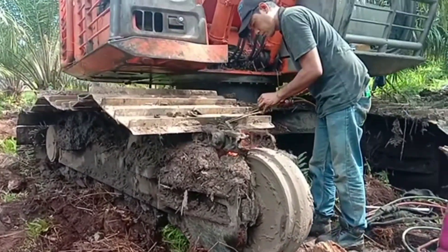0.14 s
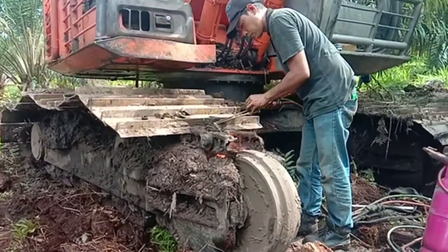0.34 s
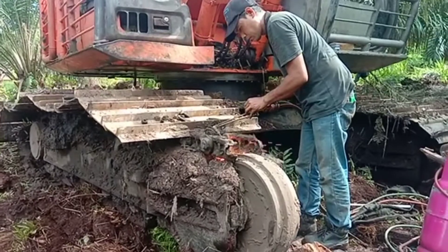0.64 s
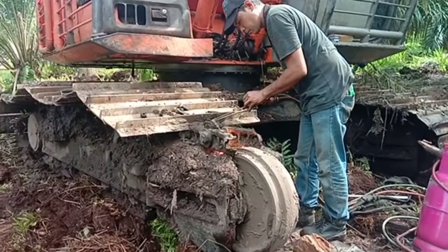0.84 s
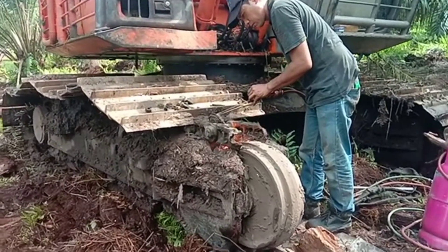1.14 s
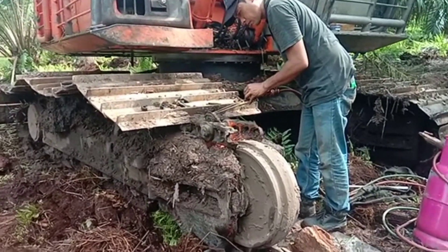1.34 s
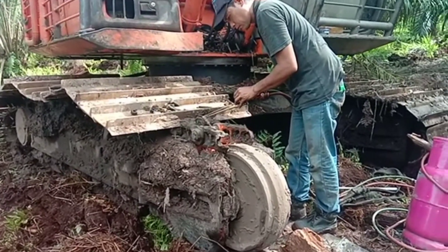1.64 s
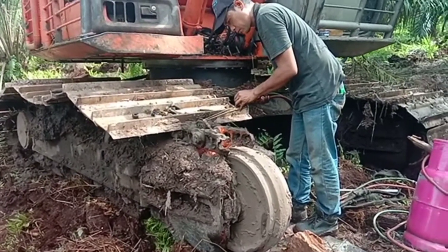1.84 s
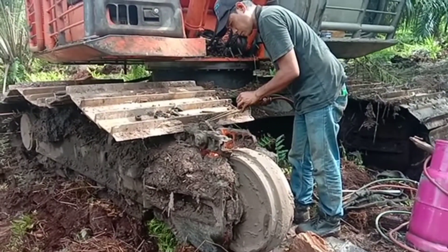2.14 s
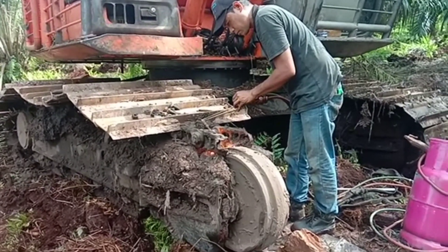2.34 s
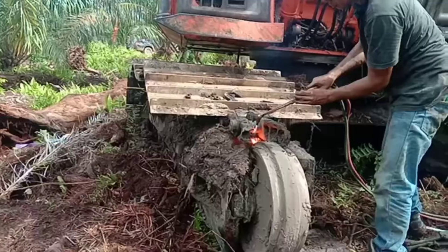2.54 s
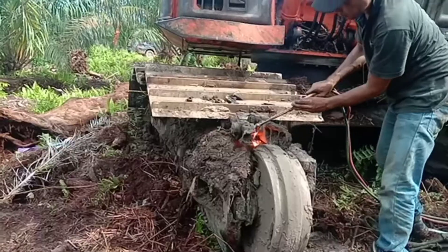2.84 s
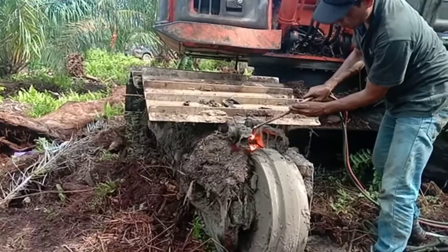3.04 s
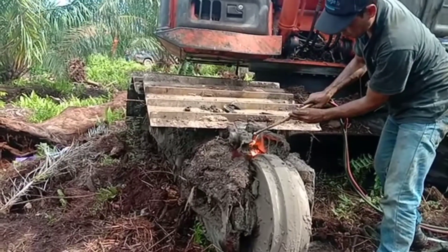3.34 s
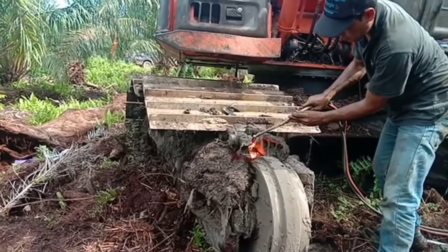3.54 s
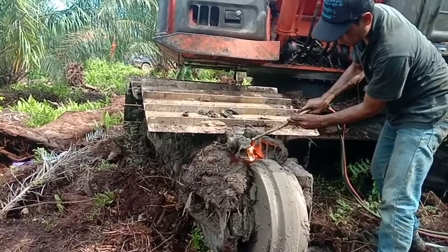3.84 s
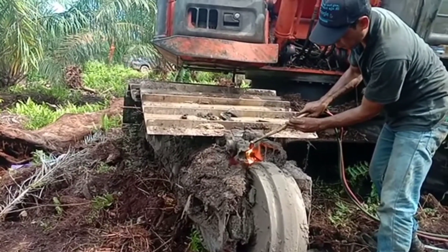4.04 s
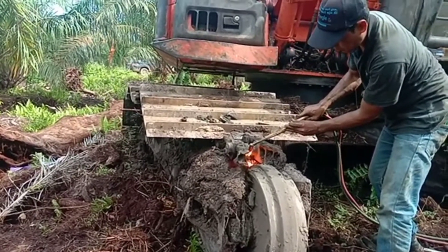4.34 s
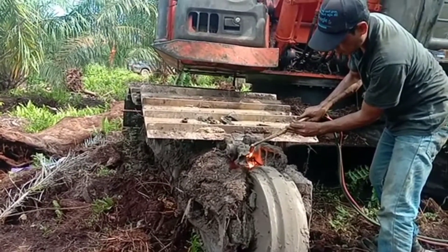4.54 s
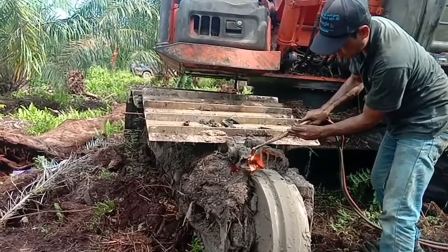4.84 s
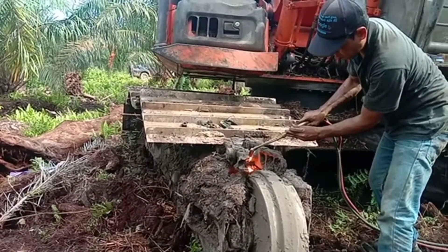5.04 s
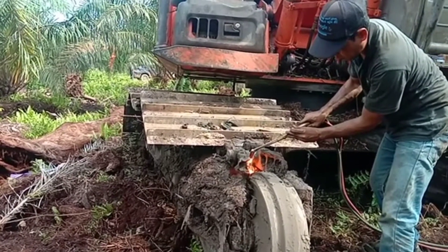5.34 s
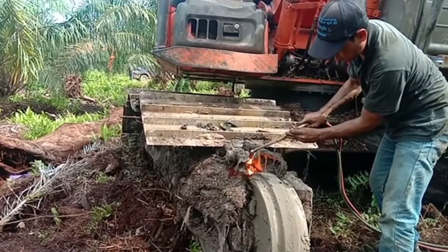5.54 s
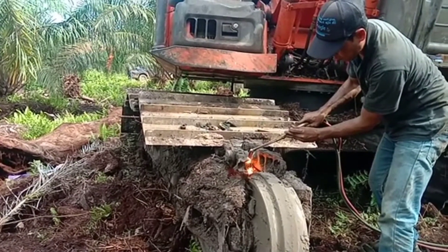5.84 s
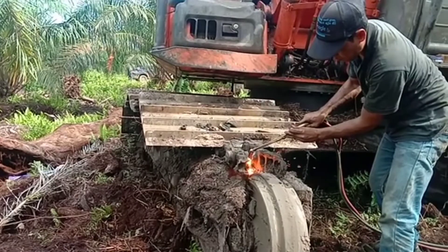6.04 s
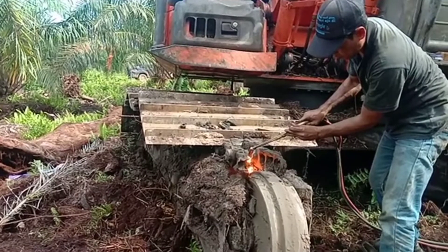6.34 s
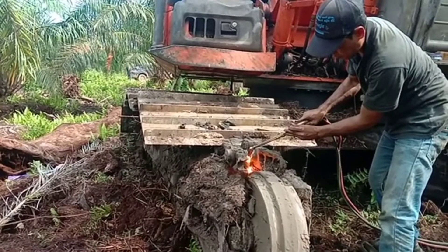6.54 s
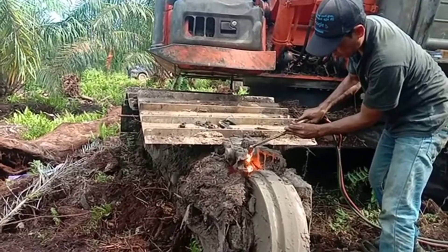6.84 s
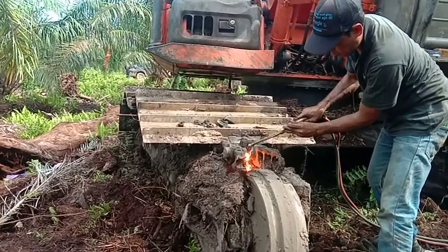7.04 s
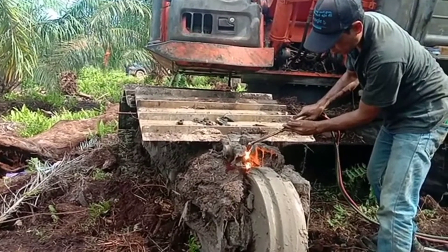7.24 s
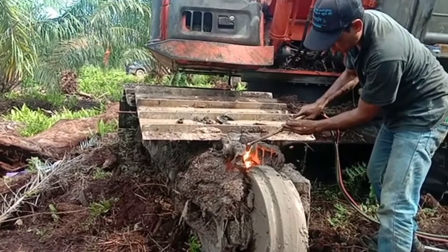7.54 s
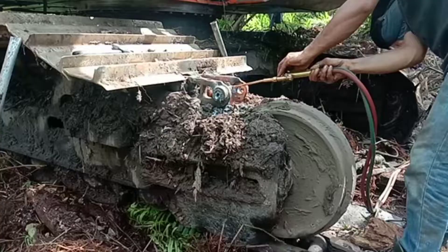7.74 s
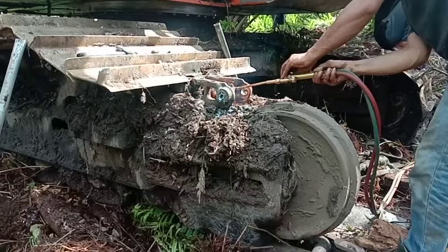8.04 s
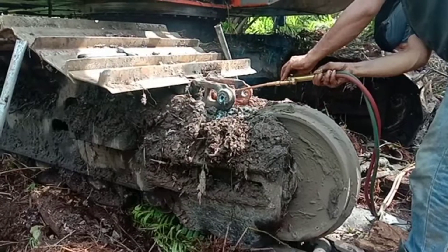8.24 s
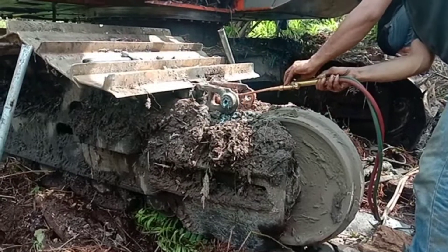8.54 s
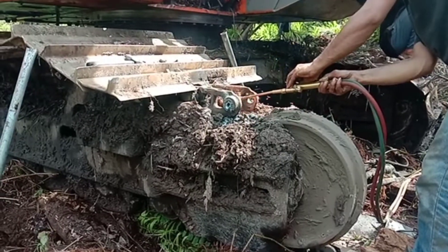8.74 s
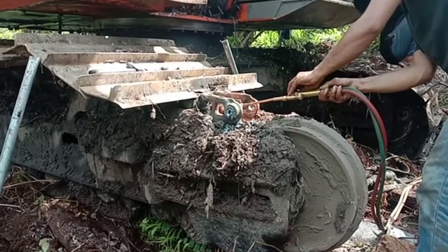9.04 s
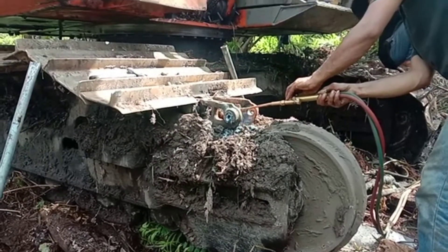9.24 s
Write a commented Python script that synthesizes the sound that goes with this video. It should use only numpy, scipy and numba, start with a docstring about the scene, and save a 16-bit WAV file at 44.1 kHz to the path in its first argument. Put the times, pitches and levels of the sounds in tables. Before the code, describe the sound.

A cutting torch hisses and roars on steel outdoors, gurgling, rumbling, fading to silence, then a sharp pop and two close hard blasts of gas.

```python
"""An oxy-fuel torch cuts a steel track chain on an excavator outdoors, heard from three places in turn.
From the side, the oxygen jet hisses brightly (filtered noise) and the flame gurgles in the molten pool.
From the front, the jet pierces with a rumble; the sound fades out, its upper hiss fluttering more when quiet.
After a silence the flame pops, and close by come two hard blows, the first ringing the cut, then a whisper.
Throughout, noise roars in the cut, a hollow rings, slag spits, and nearby track plates comb the sound."""
import sys
import numpy as np
from scipy import signal
from scipy.fft import rfft, irfft, next_fast_len
from scipy.io import wavfile
from scipy.ndimage import uniform_filter1d, map_coordinates
from numba import njit

SR = 44100
rng = np.random.default_rng(int(sys.argv[2]) if len(sys.argv) > 2 else 0)


def persist_wave(psi):
    """Save psi, clipped to +-1, as 16-bit WAV."""
    counts = np.round(np.clip(psi, -1, 1) * 32767).astype(np.int16)
    wavfile.write(sys.argv[1], SR, np.atleast_2d(counts).T)


N = 414099
TIME = np.arange(N) / SR

# level of the torch's sound, at each place: (t/s, flame roar level/dB, jet hiss level/dB)
SIDE_BLOW = [(0.0, -36, -36.5), (0.12, -32.5, -34), (0.53, -30, -30.5), (1.02, -32, -36),
             (1.32, -30.5, -29.5), (1.54, -34, -32), (1.7, -32, -34), (2.2, -31, -29), (2.3, -33, -33)]
FRONT_BLOW = [(2.42, -32, -43), (2.99, -35, -42.5), (3.09, -37.5, -45), (3.25, -33.5, -42.5),
              (3.69, -39, -40.5), (3.75, -36, -34.5), (3.98, -38, -42.5), (4.17, -34.5, -34),
              (4.82, -34.5, -34.5), (5.45, -37, -39.5), (5.57, -37, -46), (5.76, -38.5, -41),
              (6.22, -45.5, -50), (6.57, -51, -47), (6.99, -56, -53.5), (7.04, -52.5, -54),
              (7.14, -57, -59), (7.26, -54.5, -56.5)]
CLOSE_BLOW = [(8.0, -33.5, -34.5), (8.112, -35.5, -34), (8.242, -42.5, -39), (8.674, -45, -38),
              (8.822, -32.5, -37), (9.04, -36, -39), (9.102, -49.5, -56), (9.204, -49.5, -51.5),
              (9.36, -48.5, -61.5)]
# tone colour of the oxygen jet, from each place: (f/Hz, relative level per Hz/dB)
SIDE_JET_COLOUR = [(2800, -37.5), (4200, -21.5), (4870, -7.5), (5500, -3.5), (6830, 0.5), (7450, 0),
                   (8000, -8.5), (8780, -6), (9900, -13.5), (11500, -3), (12700, -2.5), (14000, -12),
                   (14750, 1.5), (15600, -7.5)]
FRONT_JET_COLOUR = [(2590, -32), (4400, -12), (5070, -19), (5290, -23), (5460, -4), (6230, -5.5),
                    (6810, 0.5), (7340, 0), (8190, -4.5), (9500, -3.5), (11000, -14), (13400, -12),
                    (14600, -3), (15200, 1), (15500, -19)]
CLOSE_JET_COLOUR = [(2400, -54), (4100, -33), (4580, -2.5), (5600, -1.5), (7350, -4), (8270, -9),
                    (9240, -3), (10500, -10.5), (12500, -2), (13700, -18), (15000, 8), (15600, -1)]
# tone colour of the flame in the cut, from each place: (f/Hz, relative level per Hz/dB)
SIDE_ROAR_COLOUR = [(800, -39), (1080, -25), (1270, -0.5), (1470, -6), (1790, -7), (2070, -0.5), (2340, -1),
                    (2650, -3), (3600, -9), (3800, -11.5), (4190, -29.5), (5700, -58)]
FRONT_ROAR_COLOUR = [(800, -55), (1000, -18.5), (1270, -7.5), (1550, -7.5), (1800, -1.5), (2430, 0.5),
                     (2740, 1), (3080, -1.5), (3320, -3.5), (3820, -4.5), (4200, -11.5), (4430, -37),
                     (5300, -42)]
CLOSE_ROAR_COLOUR = [(750, -35), (1000, -14), (1250, -2), (1420, -16.5), (1600, 1), (1740, -9), (1890, -2),
                     (2050, -4.5), (2200, 0), (2780, -9.5), (3020, -23.5), (3600, -17), (4900, -27)]
# turbulent body of the flame: (f/Hz, relative level per Hz/dB)
RUMBLE_COLOUR = [(24, -69.5), (40, -31.5), (279, -4.5), (333, -8.5), (371, -11), (426, 0), (530, -6.5),
                 (591, 0.5), (651, -3), (821, 1), (941, -11), (1050, -9), (1360, -40), (2310, -120)]
# melt blown into a spray: (f/Hz, relative level per Hz/dB)
SPRAY_COLOUR = [(2000, -31.0), (3200, 11), (5000, -2), (9000, -5.0), (15000, -3)]
# how far the jet has pierced the steel, heard from the front: (t/s, share 0-1)
PIERCE = [(2.4, .9), (2.6, 1), (3.0, 0.2), (3.9, 1), (4.15, 0.26), (5.0, 0)]
# pops of the flame: (t/s, crack level/dB, thump level/dB, length of the push/ms)
POPS = [(7.7099, -36, -42, .16), (7.7326, -44, -51, .25), (7.9382, -17, -14.5, .24)]
# the jet whistles on a sharp edge or across the hollow: (middle t/s, length/s, f/Hz, level/dB)
WHISTLES = [(2.73, 0.11, 14600, -45), (9.106, 0.087, 5520, -52), (9.215, 0.092, 5730, -65),
            (9.254, 0.092, 2460, -52), (9.298, 0.079, 5250, -58), (9.335, 0.15, 1248, -44.5)]
# sound paths via the farther track plates: (delay/ms, level/dB)
FAR_PLATES = [(3.3, -21), (6.101, -17)]

# roar and hiss at full blow; the other layers are set against this level
FULL_DB = -34.5
# a jet that blows through rumbles, sizzles and swirls more: dB added when fully pierced
PIERCE_RUMBLE_DB, PIERCE_SIZZLE_DB, PIERCE_EDDY_DB = 7.5, 3.5, 1.8
# the upper hiss flutters more when quiet: dB below full level where it does so most, and dB of flutter added
QUIET_BELOW_DB, QUIET_FLUTTER_DB = 13.5, 2.5
# note of the hollow between the chain links
HOLLOW_HZ = 1275.4
# slag spits, relative to the gas noise before colouring
JET_SPIT_DB, FLAME_SPIT_DB = -16, -14.5
# side to front is a hard cut; front to close fades out and in again
CUT_S, SILENT_FROM_S, SILENT_TO_S = 2.37, 7.542, 7.636
FADE_OUT_S, FADE_OUT_POWER, FADE_IN_S, FADE_IN_POWER = 0.26, 0.91, 0.33, 2.09
TOP_HZ = 15550


def jet(outline, hiss_db, sizzle_db, edge_hz, edge_db, eddy_db, flutter_db):
    """Oxygen hisses out of the nozzle, sings broadly on the steel's edge and sizzles in the melt."""
    gas = turbulence(eddy_hz=416, eddy_rate=11, eddy_db=eddy_db, surge_rate=24, surge_db=1.0)
    spits = slag(rate=190, spread_db=3.5, ring_s=0.0007)
    gas = colour(gas + undb(JET_SPIT_DB) * spits, outline)
    hiss = low_part(gas, 8, 10200)
    sizzle = unit(gas - hiss)
    edge = undb(edge_db) * unit(ring_noise_twice(edge_hz, 1000))
    sizzle_gain = undb(sizzle_db + flutter_db * walk(22))
    return undb(hiss_db) * unit(unit(hiss) + edge) + sizzle_gain * sizzle


def flame(outline, roar_db, hollow_db, body_db):
    """The flame roars in the cut and rings a hollow between the chain links; body_db weights its lower part."""
    gas = turbulence(eddy_hz=250.0, eddy_rate=16, eddy_db=1.5, surge_rate=18, surge_db=0.62)
    spits = slag(rate=64, spread_db=2.5, ring_s=0.0014)
    gas = unit(colour(gas + undb(FLAME_SPIT_DB) * spits, outline))
    body = low_part(gas, 6, 1650)
    # a wavering note, narrowed again around the hollow's own pitch
    ring = resonate(rng.standard_normal(N), HOLLOW_HZ * (1 + 0.0094 * walk(4.4)), 110.0)
    ring = resonate(ring, np.full(N, float(HOLLOW_HZ)), 210.0)
    hollow = undb(hollow_db) * unit(ring)
    return undb(roar_db) * unit(gas - body + undb(body_db) * body + hollow)


def rumble(deep_db):
    """The burning gas flutters low down; its deepest part comes in puffs."""
    gas = turbulence(eddy_hz=152, eddy_rate=12, eddy_db=3.0, surge_rate=18, surge_db=1.4)
    gas = colour(gas, RUMBLE_COLOUR)
    deep = low_part(gas, 3, 230)
    puffs = undb(3.8 * walk(16) + deep_db)
    return unit(gas - deep + deep * puffs)


def gurgle(centre_hz, width_hz, wander):
    """The flame gurgles in the molten pool; its note wavers and breaks up."""
    hz = centre_hz * (1 + wander * walk(15))
    return unit(ring_noise_twice(hz, width_hz)) * undb(5.1 * walk(13.88))


def spray(hiss_db):
    """A strong jet blows the melt into a spray whose broad hiss grows faster than the jet's own."""
    level_db = follow(hiss_db, full_db=-41.5, growth=1.5)
    return undb(level_db) * unit(colour(rng.standard_normal(N), SPRAY_COLOUR))


def kerf(hiss_db, centre_hz, width_hz):
    """Only a hard-blown jet rings the narrow slot of the cut; the ring's level falls steeply with the hiss."""
    hz = centre_hz * (1 + 0.011 * walk(6))
    level_db = follow(hiss_db, full_db=-49, growth=4.6)
    return undb(level_db) * unit(ring_noise_twice(hz, width_hz))


def slag(rate, spread_db, ring_s):
    """Molten droplets burst in the jet: many tiny spits (rate per second), a few larger."""
    sizes_db = spread_db * np.minimum(rng.exponential(size=N), 4)
    spits = (rng.random(N) < rate / SR) * undb(sizes_db)
    dying = signal.lfilter([1], [1, -np.exp(-1 / (ring_s * SR))], spits)
    return unit(dying * rng.standard_normal(N))


def pops(thump_hz, thump_s, ring_hz, ring_db):
    """A pocket of gas ignites: a sharp push that rings the hollow, then a damped swing back."""
    cracks, thumps = np.zeros(N), np.zeros(N)
    for s, crack_db, thump_db, push_ms in POPS:
        cracks += undb(crack_db) * np.exp(-(1000 * (TIME - s) / push_ms) ** 2)
        since_s = np.clip(TIME - s - 0.0005, 0, 1)  # the swing starts half a millisecond later
        swing = np.sin(2 * np.pi * thump_hz * since_s) * np.exp(-since_s / thump_s)
        thumps -= undb(thump_db) * swing
    ring = resonate(cracks, np.full(N, float(ring_hz)), 130.0)
    return cracks + thumps + undb(ring_db) * ring


def whistles(width_hz):
    """Narrow, wavering edge tones that swell and die."""
    out = np.zeros(N)
    for s, length_s, hz, db in WHISTLES:
        tone = resonate(rng.standard_normal(N), hz * (1 + 0.0045 * walk(24)), float(width_hz))
        swell = np.exp(-(2 * (TIME - s) / length_s) ** 2)
        out += undb(db) * unit(tone) * swell
    return out


def plates(x, near_ms, near_db, sway_ms):
    """Short reflections from the nearest plate and the farther ones comb the sound; it sways with the hand."""
    out, power = x, 1
    for delay_ms, db in [(near_ms, near_db), *FAR_PLATES]:
        lag = (delay_ms + sway_ms * walk(4)) * SR / 1000  # in samples
        out = out + undb(db) * map_coordinates(x, [np.arange(N) - lag], order=2)
        power = power + undb(2 * db)
    return out / np.sqrt(power)


def turbulence(eddy_hz, eddy_rate, eddy_db, surge_rate, surge_db):
    """Gas noise: eddies swell in patches eddy_hz wide and glide in pitch while the whole stream surges."""
    f, t, z = signal.stft(rng.standard_normal(N), SR, nperseg=512)
    depth_db = np.interp(t, TIME, eddy_db * np.ones(N))
    glide = np.interp(t, TIME, 2 * walk(4))  # in patches
    row, column = np.meshgrid(f / eddy_hz, t * eddy_rate, indexing="ij")
    patches = rng.standard_normal((160, 512))
    eddies = map_coordinates(patches, [row + glide, column], order=2, mode="wrap")
    gain = undb(depth_db * eddies)
    gain = gain / np.sqrt(np.mean(gain ** 2, axis=0))  # eddies move energy about without adding any
    gas = signal.istft(z * gain, SR)[1][:N]
    return unit(gas) * undb(surge_db * walk(surge_rate))


@njit
def resonate(x, hz, width):
    """State-variable band-pass, width in Hz, whose centre moves every sample."""
    y, band, low = np.empty(len(x)), 0., 0.
    for i in range(len(x)):
        g, k = np.tan(np.pi * hz[i] / SR), width / hz[i]
        v = (band + g * (x[i] - low)) / (1 + g * (g + k))
        band, low, y[i] = 2 * v - band, low + 2 * g * v, k * v
    return y


def ring_noise_twice(hz, width_hz):
    """Noise through the same moving resonance twice, for steeper sides."""
    once = resonate(rng.standard_normal(N), hz, float(width_hz))
    return resonate(once, hz, float(width_hz))


def low_part(x, order, top_hz):
    """The part of a sound below top_hz, without delay, so that x minus it is the upper part."""
    return signal.sosfiltfilt(signal.butter(order, top_hz, fs=SR, output="sos"), x)


def colour(x, points):
    """Filter by a (f/Hz, level/dB) outline."""
    hz, db = np.transpose(points)
    size = next_fast_len(N + 4096)
    f = np.maximum(np.fft.rfftfreq(size, 1 / SR), 1)
    gain = undb(np.interp(np.log(f), np.log(hz), db))
    return irfft(rfft(x, size) * gain, size)[:N]


def walk(rate):
    """Random levels, each held 1 / rate seconds and smoothed twice; rms 1."""
    k = int(SR / rate)
    held = np.repeat(rng.standard_normal(N // k + 2), k)[rng.integers(k):][:N]
    return unit(uniform_filter1d(uniform_filter1d(held, k), k))


def curves(table):
    """Each column of a table, joined by straight lines in time."""
    s, *columns = np.transpose(table)
    return [np.interp(TIME, s, c) for c in columns]


def follow(drive_db, full_db, growth):
    """Level of a layer that has full_db at full blow and gains growth dB for each dB of its drive."""
    return full_db + growth * (drive_db - FULL_DB)


def tilt(at_s, length_s, from_hz, to_hz):
    """The hand tilts the nozzle, and the note of the jet on the edge slides to a new pitch around at_s."""
    return from_hz + (to_hz - from_hz) * np.clip((TIME - at_s) / length_s + 0.5, 0, 1)


def fade(elapsed_s, length_s, power):
    """Gain that grows from 0 to 1 over length_s."""
    return np.clip(elapsed_s / length_s, 0, 1) ** power


def undb(db):
    """Decibels to gain."""
    return 10 ** (np.asarray(db) / 20)


def unit(x):
    """Scale to rms 1."""
    return x / np.sqrt(np.mean(x ** 2))


def from_side():
    """Bright hiss; the flame gurgles in the molten pool."""
    roar_db, hiss_db = curves(SIDE_BLOW)
    sizzle_db = follow(hiss_db, full_db=-37, growth=0.5)
    edge_hz = tilt(at_s=1.14, length_s=0.24, from_hz=5070, to_hz=8620)
    oxygen = jet(SIDE_JET_COLOUR, hiss_db, sizzle_db, edge_hz, edge_db=-8.0, eddy_db=1.1, flutter_db=0.0)
    roar = flame(SIDE_ROAR_COLOUR, roar_db, hollow_db=-11, body_db=-1.5)
    low = undb(follow(hiss_db, full_db=-55.5, growth=1.13)) * rumble(deep_db=0)
    pool_gain = undb(follow(hiss_db, full_db=-54, growth=0.25))
    pool = pool_gain * gurgle(centre_hz=919, width_hz=127, wander=0.037)
    return plates(oxygen + roar + low + pool, near_ms=1.45, near_db=-30.5, sway_ms=0.017)


def from_front():
    """The jet pierces the steel with a rumble; later the sound fades and its upper hiss flutters more."""
    roar_db, hiss_db = curves(FRONT_BLOW)
    pierce, = curves(PIERCE)
    quietness = np.clip((FULL_DB - hiss_db) / QUIET_BELOW_DB, 0, 1)
    sizzle_db = follow(hiss_db, full_db=-41.5, growth=0.84) + PIERCE_SIZZLE_DB * pierce
    edge_hz = tilt(at_s=3.25, length_s=0.27, from_hz=9700, to_hz=7220)
    oxygen = jet(FRONT_JET_COLOUR, hiss_db, sizzle_db, edge_hz, edge_db=-6.5,
                 eddy_db=2.2 + PIERCE_EDDY_DB * pierce, flutter_db=0.1 + QUIET_FLUTTER_DB * quietness)
    hollow_db = follow(roar_db, full_db=-10, growth=0.4)
    body_db = follow(roar_db, full_db=0.0, growth=0.33)
    roar = flame(FRONT_ROAR_COLOUR, roar_db, hollow_db, body_db)
    rumble_db = follow(roar_db, full_db=-51.0, growth=1.09) + PIERCE_RUMBLE_DB * pierce
    low = undb(rumble_db) * rumble(deep_db=-4.0)
    return plates(oxygen + roar + low + spray(hiss_db), near_ms=1.67, near_db=-12.5, sway_ms=0.045)


def from_close():
    """Two hard blows, the first ringing the cut; then the oxygen drops to a whisper."""
    roar_db, hiss_db = curves(CLOSE_BLOW)
    sizzle_db = follow(hiss_db, full_db=-37, growth=1.24)
    edge_hz = tilt(at_s=8.1, length_s=0.9, from_hz=5100, to_hz=5600)
    oxygen = jet(CLOSE_JET_COLOUR, hiss_db, sizzle_db, edge_hz, edge_db=-9, eddy_db=0.0, flutter_db=1.7)
    roar = flame(CLOSE_ROAR_COLOUR, roar_db, hollow_db=-7, body_db=2)
    low = undb(follow(roar_db, full_db=-49.5, growth=0.65)) * rumble(deep_db=-2.5)
    slot = kerf(hiss_db, centre_hz=3480, width_hz=780)
    return plates(oxygen + roar + low + slot, near_ms=1.564, near_db=-15.5, sway_ms=0.028)


def scene():
    """From the side, then the front, and after a moment of silence close to the idler wheel."""
    first = np.where(TIME < CUT_S, from_side(), from_front())
    first = first * fade(SILENT_FROM_S - TIME, FADE_OUT_S, FADE_OUT_POWER)
    second = from_close() * fade(TIME - SILENT_TO_S, FADE_IN_S, FADE_IN_POWER)
    bangs = pops(thump_hz=109.1, thump_s=0.0035, ring_hz=1280, ring_db=-3)
    mono = first + second + whistles(width_hz=30) + bangs
    return np.array([mono, mono])


def record(dry):
    """One microphone on both channels, with a bass cut and a steep top cut."""
    thin = signal.sosfilt(signal.butter(3, 55, "high", fs=SR, output="sos"), dry)
    return signal.sosfiltfilt(signal.ellip(10, 0.05, 60, TOP_HZ, fs=SR, output="sos"), thin)


dry = scene()
out = record(dry)
persist_wave(out)
```